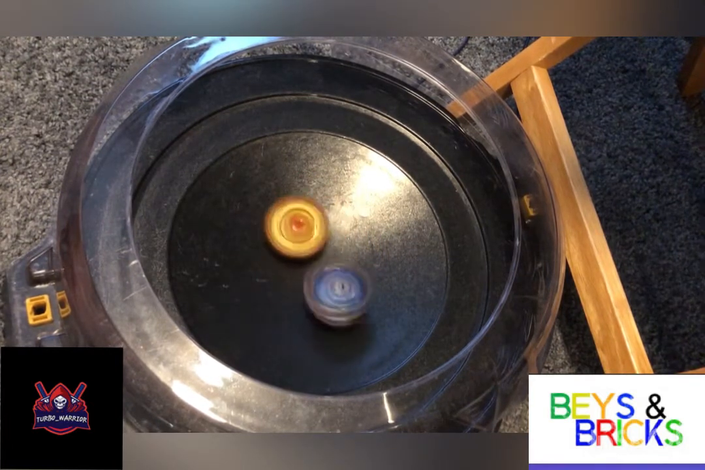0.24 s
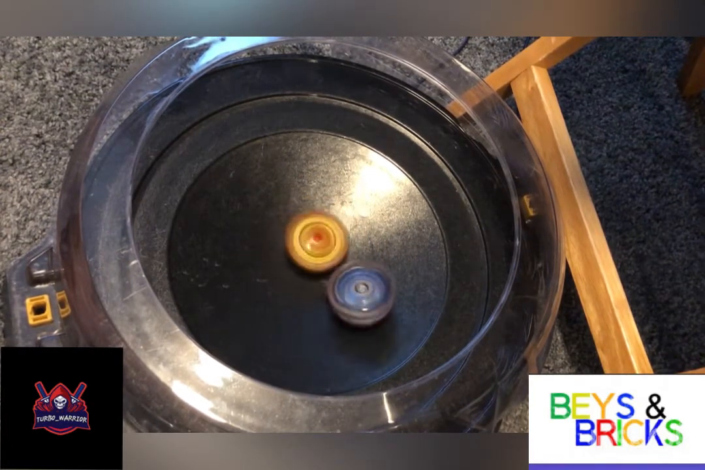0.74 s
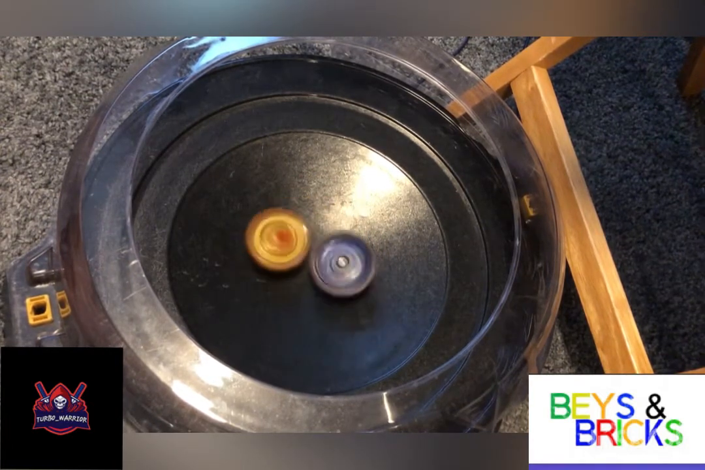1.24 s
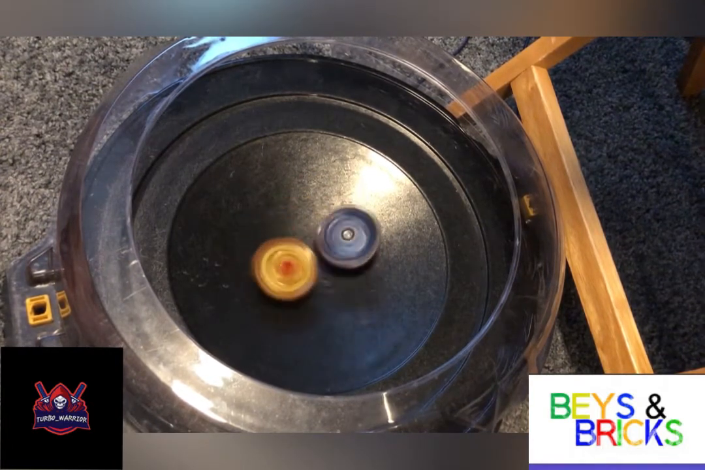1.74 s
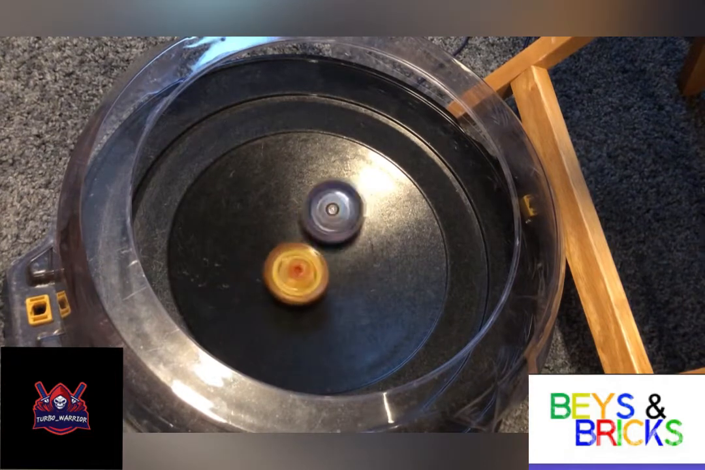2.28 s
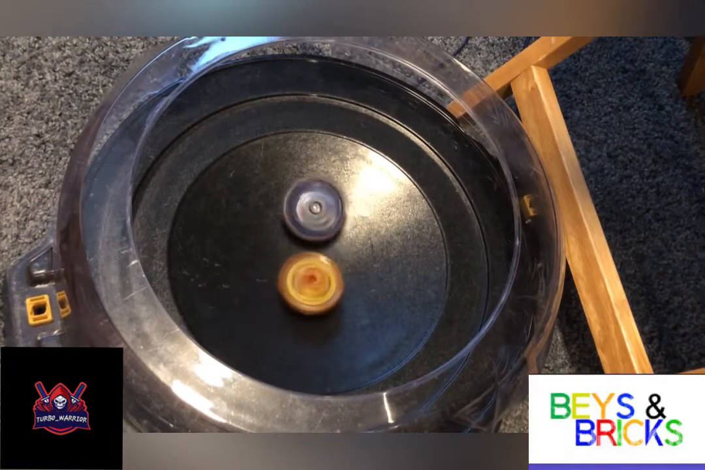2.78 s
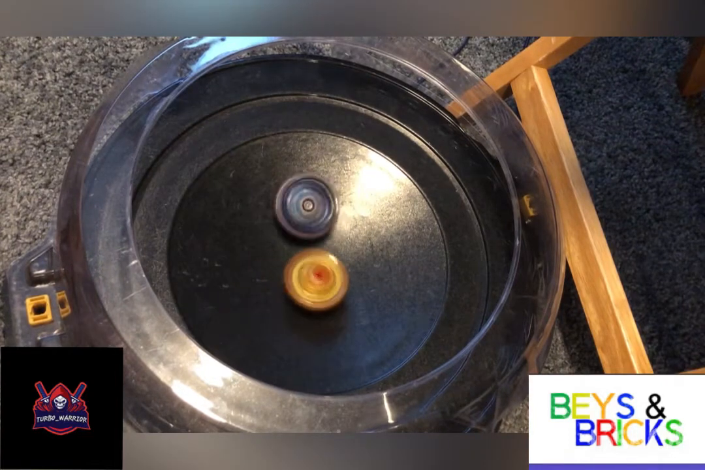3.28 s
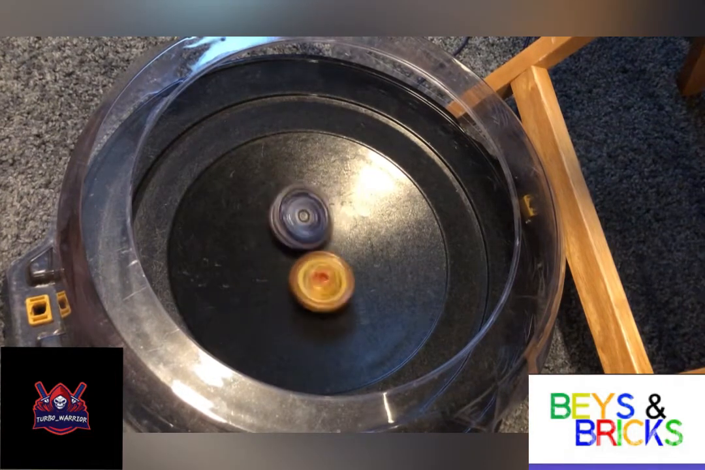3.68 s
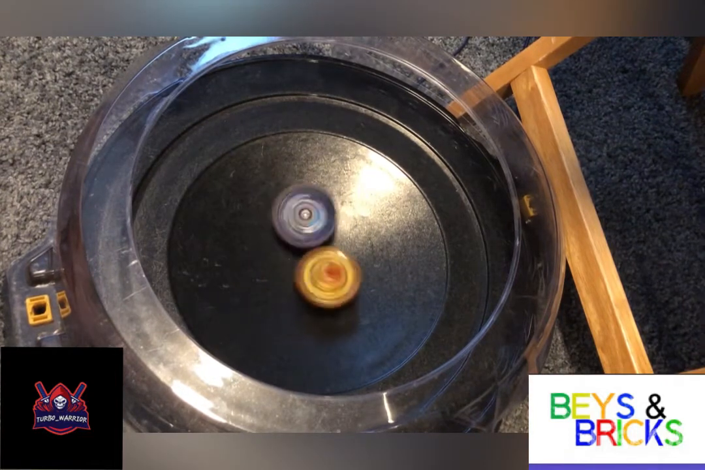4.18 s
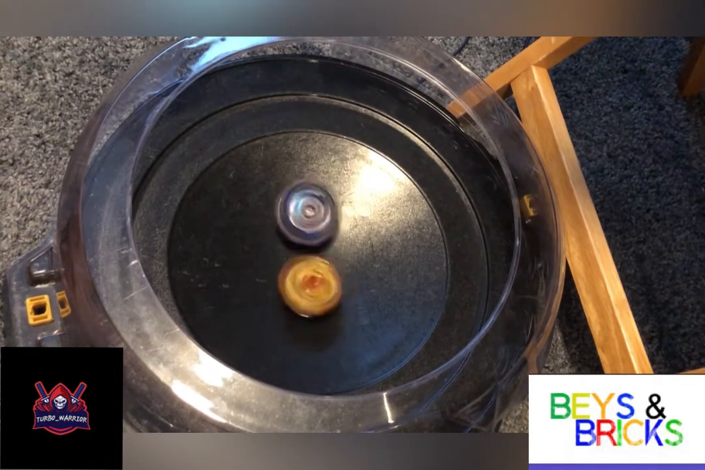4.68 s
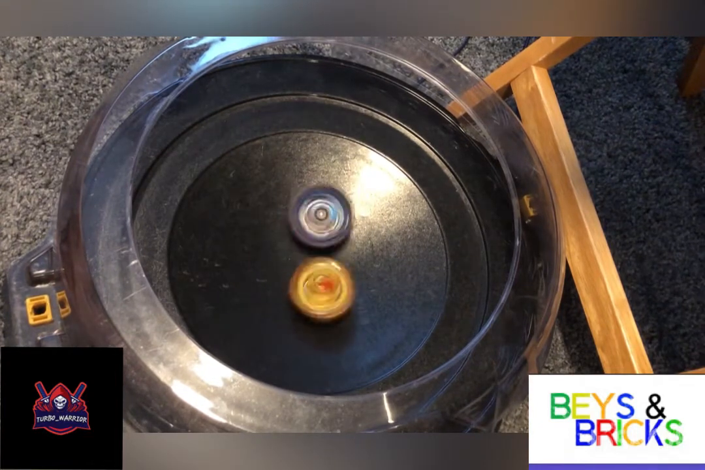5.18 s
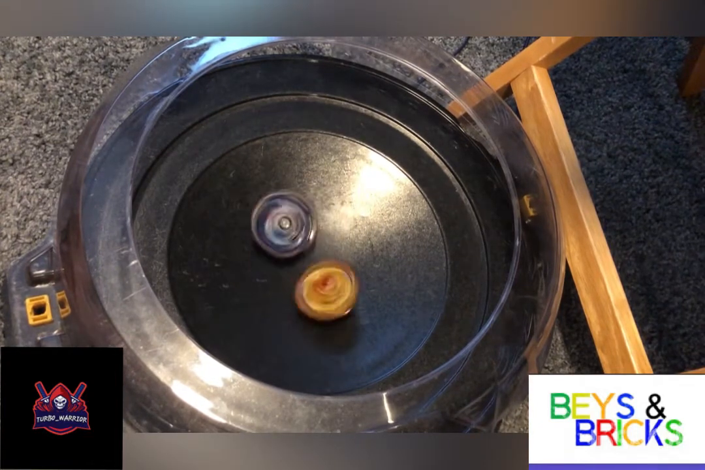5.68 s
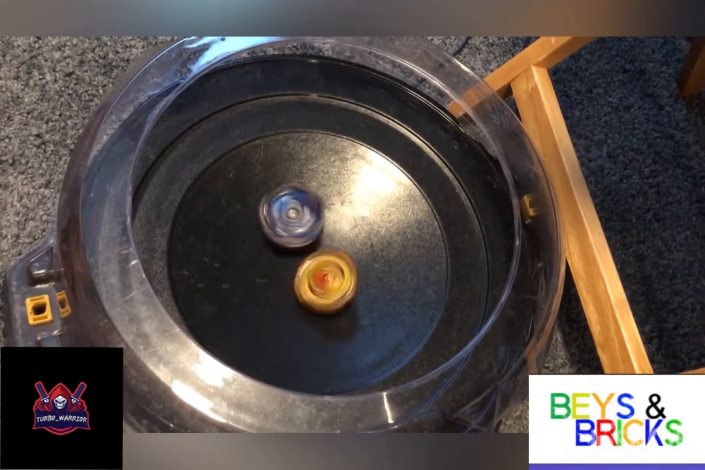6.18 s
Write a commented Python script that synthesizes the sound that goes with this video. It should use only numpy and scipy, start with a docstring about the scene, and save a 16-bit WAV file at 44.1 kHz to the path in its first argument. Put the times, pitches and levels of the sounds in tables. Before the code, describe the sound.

Two toy spinning tops with metal weight rings knock together in a hollow plastic arena. Sharp cracks with a short bowl thump come several times a second, unevenly, some leaving a thin high ring. Quick softer taps of wobbling tops fill the gaps, over a fluctuating scrape of tips and a faint low hum. Close microphone, small indoor space, short reflections from the bowl.

```python
"""Two toy spinning tops clash in a plastic arena: each clash cracks, thumps the bowl and rings the weight rings.
Blows are shaped noise plus one push through the bowl's response; rings are decaying, fluttering sines.
Between clashes a wobbling top taps the floor about once a turn, as softer blows.
The tips grind (filtered noise and skips) and squeak (gliding tones) over a low hum in a soft rumble."""
import sys
import numpy as np
from scipy import signal
from scipy.fft import rfft, irfft, next_fast_len
from scipy.io import wavfile
from scipy.ndimage import uniform_filter1d

SR = 44100
rng = np.random.default_rng(int(sys.argv[2]) if len(sys.argv) > 2 else 0)


def log_audio(samples):
    """Write samples as a 16-bit WAV file to the path given in sys.argv[1]."""
    # one column per channel
    frames = np.atleast_2d(samples).T
    # limit to full scale, then quantise
    limited = np.clip(frames, -1, 1)
    pcm = np.round(limited * 32767).astype(np.int16)
    wavfile.write(sys.argv[1], SR, pcm)


N = 283561
TIME_S = np.arange(N) / SR


def amp(db):
    """Amplitude factor of a level in dB."""
    return 10 ** (np.asarray(db) / 20)


def evened(x):
    """Scale to unit RMS."""
    return x / np.sqrt(np.mean(x ** 2) + 1e-20)


def add(mix, start_s, sound):
    """Mix a sound in at its start time, cut at the end of the scene."""
    part = mix[max(round(start_s * SR), 0):][:len(sound)]
    part += sound[:len(part)]


def drift(corner_hz):
    """Random wandering of unit RMS: noise low-passed at corner_hz."""
    size = next_fast_len(N)
    smooth = 1 / (1 + (np.fft.rfftfreq(size, 1 / SR) / corner_hz) ** 4)
    return evened(irfft(rfft(rng.standard_normal(size)) * smooth, size)[:N])


# resonances of plastic bowl and shells: (f/Hz, width/Hz, height/dB at depth 1)
BOWL_MODES = [(168.5, 52, 10.5), (259.4, 51, 14), (313, 7.3, 12.5), (413, 182, 18), (562, 58, 5.5),
              (725, 110, 6.5), (1020, 63, 7), (1277, 274, 11), (1551, 83, 9.5), (1947, 59, 10),
              (2406, 244, 8.5), (2724, 104, 9.5), (2882, 160, 8.5), (4180, 470, 9), (4720, 370, 6.5),
              (8330, 750, 3)]
FREQS_HZ = np.fft.rfftfreq(8192, 1 / SR)


def body(colour, lo_hz, hi_hz, depth):
    """Minimum-phase response of the bowl in one band: broad colour plus resonances scaled by depth."""
    hz, db = np.transpose(colour)
    peaks_db = sum(height / (1 + (2 * (FREQS_HZ - f) / width) ** 2) for f, width, height in BOWL_MODES)
    colour_db = np.interp(np.log(FREQS_HZ + 1), np.log(hz), db)
    high_pass = 1 + (lo_hz / (FREQS_HZ + 1)) ** 8
    low_pass = 1 + (FREQS_HZ / hi_hz) ** 8
    gain = amp(colour_db + depth * peaks_db) / np.sqrt(high_pass * low_pass)
    log_gain = np.log(np.maximum(gain, gain.max() * 1e-4))
    circle = np.concatenate([log_gain, log_gain[-2:0:-1]])
    spectrum = np.exp(np.conj(signal.hilbert(circle)))  # log gain sets the phase
    return np.fft.ifft(spectrum).real[:len(FREQS_HZ) // 2]


def blow(response, push, rise_s, first_s, tail, t60_s, lumps_db):
    """One push amid ms of uneven chatter, then weakening arena reflections; unit RMS over the first 15 ms."""
    t = np.arange(SR // 5) / SR
    noise, sizes = rng.standard_normal((2, len(t)))
    swell = 1 - np.exp(-(t / rise_s) ** 2)
    contacts = evened(uniform_filter1d(sizes, size=48))  # about 1 ms each
    lumps = amp(lumps_db * np.clip(contacts, -2, 2))
    decay = np.exp(-t / first_s) + tail * amp(-60 * t / t60_s)
    force = noise * swell * evened(lumps) * decay
    force[round(rise_s * SR)] += push
    sound = signal.fftconvolve(force, response)
    return sound / np.sqrt(np.mean(sound[:round(.015 * SR)] ** 2))


# broad colour of the grind: (f/Hz, level/dB)
GRIND_COLOUR = [(20, -28), (40, -18), (70, 7), (130, -11.5), (250, -8.5), (500, -10), (900, -8.5),
                (1400, -20.5), (1900, -23), (3000, -18.5), (4500, -15.5), (6000, -15), (10000, -18.5),
                (16000, -35)]
# grind of the tips before band gains, on the whole more as the spin runs down: (t/s, level/dB)
GRIND_LEVEL = [(0.0, -51.5), (1.16, -54), (1.4, -53.5), (1.74, -48.5), (3.53, -48), (3.94, -57),
               (4.15, -43.5), (4.32, -46.5), (4.73, -50), (5.62, -43.5), (6.07, -49), (6.43, -48)]


def rolling(rumble_db, scrape_db, hiss_db, uneven_db, throb_db, skips_per_s, skip_size):
    """Tips grind over plastic and skip on scratches: noise and impulses, throbbing once a turn as spin slows."""
    grind_db = np.interp(TIME_S, *np.transpose(GRIND_LEVEL))
    mean_db = grind_db.mean()
    spin_hz = np.interp(TIME_S, [0, N / SR], [22, 15]) + drift(9.5)
    turns = np.cumsum(spin_hz) / SR
    throb = amp(throb_db * np.sin(2 * np.pi * turns))
    sizes = skip_size * np.minimum(rng.exponential(1, N), 2.5)
    skips = sizes * (rng.random(N) < skips_per_s / SR)
    out = np.zeros(N)
    # (lower f/Hz, upper f/Hz, gain/dB, share of level changes, share of skips)
    bands = [(94.0, 636, rumble_db, 1.5, 1),
             (740, 1840, scrape_db, 1.05, 0.91),
             (1980, 22000, hiss_db, 0.9, .1)]
    for lo_hz, hi_hz, gain_db, follow, skip_share in bands:
        rubbing = rng.standard_normal(N) * amp(uneven_db * drift(19))
        force = (rubbing + skip_share * skips) * throb
        grind = signal.oaconvolve(force, body(GRIND_COLOUR, lo_hz, hi_hz, depth=0.9))[:N]
        level_db = gain_db + mean_db + follow * (grind_db - mean_db)
        out += amp(level_db) * evened(grind)
    return out


def squeaks(gain_db, hz, glide, width_hz, uneven_db):
    """Each of two tips chirps faintly within the scrape: a gliding sine under random amplitude."""
    level = amp(np.interp(TIME_S, *np.transpose(GRIND_LEVEL)) + gain_db)
    chirps = np.zeros(N)
    for _ in range(2):
        pitch_hz = hz * np.exp(glide * drift(9))
        tone = np.sin(2 * np.pi * np.cumsum(pitch_hz) / SR)
        chirps += tone * drift(width_hz) * amp(uneven_db * drift(10.5))
    return level * evened(chirps)


HUM_FADE_DB_PER_S = 0.15


def hum(hz, tone_db, rumble_db):
    """Low sine of wavering pitch and level in low-passed noise, both fading slowly."""
    pitch_hz = hz + 3 * drift(5.7)
    tone = np.sin(2 * np.pi * np.cumsum(pitch_hz) / SR) * (1 + 0.28 * drift(36))
    # (f/Hz, level/dB)
    colour = [(20, -10), (32, 1), (42, -34), (52, 7.5), (66, -1.5), (95, 7), (125, -10.0), (200, -16.5)]
    rumble = signal.oaconvolve(rng.standard_normal(N), body(colour, 11, 240, depth=0))[:N]
    fade = amp(HUM_FADE_DB_PER_S * (TIME_S.mean() - TIME_S))
    return fade * (amp(tone_db) * evened(tone) + amp(rumble_db) * evened(rumble))


# broad colour of a tap: (f/Hz, level/dB)
TAP_COLOUR = [(60, 4), (300, -1), (700, -3.5), (1300, 0), (2000, -8.5), (2350, -7.5), (2580, -2),
              (2850, -10.5), (3300, -16.5), (4700, -24), (6000, -21), (8500, -24.5), (12000, -33),
              (16000, -28)]
# spells of wobbling, level before band gains: (first tap t/s, taps, sway period/s, level/dB)
WOBBLES = [(.001, 5, .0442, -52), (.359, 2, .044, -51.5), (0.687, 2, .049, -55.5), (.887, 1, .05, -52.5),
           (.935, 3, .051, -47), (1.357, 3, .0515, -57), (1.955, 3, .058, -45), (2.287, 1, .05, -50),
           (2.306, 1, .05, -43.5), (2.554, 2, .066, -44), (2.788, 2, .026, -50.5), (3.149, 2, .077, -46.5),
           (3.526, 3, .043, -50.5), (3.838, 1, .05, -54), (3.962, 1, .05, -56), (4.057, 1, .05, -55),
           (4.234, 5, .053, -53), (4.662, 2, .063, -56), (5.406, 1, .05, -47), (5.704, 2, .018, -55),
           (6.161, 2, 0.037, -55), (6.288, 1, .05, -52.5)]


def taps(thump_db, knock_db, clack_db, fizz_db, dulling_db_per_s):
    """Tilted top touches down each sway: short shell tick, duller as spin slows, with a faint arena trail."""
    out = np.zeros(N)
    # (lower f/Hz, upper f/Hz, push, first decay/s, share of dulling, gain/dB)
    bands = [(80, 650, 8, .005, 1, thump_db),
             (650, 1900, 4, .007, .2, knock_db),
             (1900, 3200, 9, .004, -.6, clack_db),
             (3200, 17000, 2, .006, -.2, fizz_db)]
    for lo_hz, hi_hz, push, first_s, dulling, gain_db in bands:
        response = body(TAP_COLOUR, lo_hz, hi_hz, depth=1.0)
        for start_s, count, period_s, level_db in WOBBLES:
            tap_db = level_db + gain_db + dulling * dulling_db_per_s * start_s
            for k in range(round(count)):
                tick = blow(response, push, rise_s=.0028, first_s=first_s, tail=.18, t60_s=.22, lumps_db=2.5)
                add(out, start_s + k * period_s, amp(tap_db) * tick)
    return out


# broad colour of a clash: (f/Hz, level/dB)
CLASH_COLOUR = [(30, -16.5), (60, -3), (110, 3.5), (190, -5.5), (350, -9.5), (520, -7.5), (750, -12),
                (1300, -11.5), (1850, -18), (3300, -14), (5500, -20), (7800, -16.5), (11000, -23.5),
                (16000, -16)]
# boom, thump, knock, clack, crack: (lower f/Hz, upper f/Hz, push, first decay/s, tail share, tail t60/s)
CLASH_BANDS = [(33.5, 337, 7.9, 0.0035, 0.4, 0.17), (360, 646, 11, 0.0024, 0.5, 0.11),
               (664, 1740, 5.8, 0.011, 0.43, 0.24), (2090, 6000, 2.27, 0.0044, 0.18, 0.23),
               (6300, 11000, 5, 0.0047, 0.61, .17)]
# answer of each band; slower tops boom less:
# (level/dB, dB per dB strength, dB per dB hardness, spin-down slope/(dB/s))
BAND_ANSWER = [(-28.5, 1.0, -0.06, -0.5751), (-34.5, 1.58, -0.06, .5), (-36.5, 0.67, 0.02, 0),
               (-37, 1.05, 0.99, 0.14), (-40, 1.31, 1.08, 0)]
# clashes and knocks; harder is brighter, the spot struck favours one pitch:
# (t/s, strength/dB, hardness/dB, ring/dB, favoured f/Hz)
CLASHES = [(0.2015, 3.5, 6, -7, 10540), (0.4422, 4, 0, 0, 2900), (0.4514, -7.5, 14.5, -7, 2800),
           (0.5417, -2.5, 0.5, 3.5, 2820), (.5711, 3, 4, 2.5, 2780), (0.7739, 4, 4, 11, 4140),
           (1.092, -9.5, -8.5, 14, 2800), (1.128, 7, -0.5, 5, 4470), (1.2044, -7.5, 2, -2, 2800),
           (1.236, 2, 3.5, 5.5, 8470), (1.491, -14, 6, -3, 8470), (1.501, -1, 2.5, -19, 8470),
           (1.524, -6.5, 5.5, 6.5, 8470), (1.656, 3.5, 1, -5, 4470), (1.775, 4, 0, -13, 8470),
           (1.896, -12.5, -29, -7, 4470), (2.135, -1.5, 8, -1, 2870), (2.168, -17, 12, 11, 10540),
           (2.18, 1, 0, -11, 8470), (2.361, -2, 0, 8, 10540), (2.418, 4, 1.5, 6, 8470),
           (2.66, -9.5, 4.5, 4, 10540), (2.668, 3, 1.5, -8, 8470), (2.863, 3, 2, 5, 4470),
           (2.944, -0.5, 1.5, 9, 4470), (3.005, -3.5, 5, -5, 4470), (3.016, -5, 6.5, 6, 4470),
           (3.305, -1, -1, 3.5, 2910), (3.332, -14, 10.5, -8, 8470), (3.375, -4, 6.5, -7, 6620),
           (3.445, -3, -5.5, -7, 8470), (3.452, -13, 15, -7, 6620), (3.668, -2, 2, -15, 8470),
           (3.714, -2.5, 1.5, -2, 8470), (3.904, -.5, 7, -2, 6620), (4.088, -1.5, 3.5, -12, 4470),
           (4.156, -11, -1, 14, 4470), (4.172, 0.5, 1.5, -4, 10540), (4.448, -11, -8, 0, 4570),
           (4.504, -5, -7.5, 26.5, 4470), (4.516, 3, 3.5, 8, 10540), (4.739, -.5, 0, 4, 8470),
           (4.848, -5.5, -1.5, -3, 4470), (4.862, -2, 0.5, -4, 8470), (4.973, 0, 2.5, 8, 10540),
           (5.105, -1.5, 3.5, -1, 5400), (5.274, 3, 1, 2, 4470), (5.442, -6.5, -0.5, -3, 5400),
           (5.449, 0.5, -2, -15, 8470), (5.513, -5, -5, -2, 8470), (5.567, -4.5, 2.5, 0, 8470),
           (5.787, -9.5, -46, 7, 4470), (5.81, -10.5, 0, -6, 4470), (5.869, -7.5, -3, -11, 8470),
           (5.972, -6, -8, 1, 8470), (6.094, -5.5, -0.5, -18, 8470), (6.324, -2, -3.5, -14, 10540),
           (6.38, -8, -4, -7, 4470), (6.406, -7, -10, 2, 4470)]


def clashes():
    """Rim meets rim: shells crack and tips kick the bowl; hardness goes into the treble."""
    out = np.zeros(N)
    for band, answer in zip(CLASH_BANDS, BAND_ANSWER):
        lo_hz, hi_hz, push, first_s, tail, t60_s = band
        gain_db, by_strength, by_hardness, by_time = answer
        response = body(CLASH_COLOUR, lo_hz, hi_hz, depth=0.99)
        for start_s, strength_db, hardness_db, _, _ in CLASHES:
            level_db = gain_db + by_strength * strength_db + by_hardness * hardness_db + by_time * start_s
            hit = blow(response, push, rise_s=.003, first_s=first_s, tail=tail, t60_s=t60_s, lumps_db=0.5)
            add(out, start_s, amp(level_db) * hit)
    return out


# modes, short in the shells and long in the metal weight rings: (f/Hz, level/dB, t60/s)
RING_MODES = [(2705, 0, .1), (2751, -6, .15), (2920, -2, .08), (4466, -3, 1.7), (4484, -8, .9),
              (5400, -17, .4), (5930, -12, .35), (6621, -7, .2), (8242, -11, .13), (8446, -2, .15),
              (8500, -6, .17), (9755, -16, .25), (10520, -1, .38), (10570, -6, .27), (10990, -9, .22),
              (12030, -8, .2), (14490, -11, .15)]
# how strongly a clash reaches the modes: (f/Hz, level/dB)
RING_COLOUR = [(2750, -50), (4470, -81), (6600, -50), (8470, -58), (10540, -80.5), (12000, -53)]
FAVOUR_DB, FAVOUR_WIDTH_HZ = 17.5, 540


def rings(min_spin_hz, swing, scatter_db):
    """Strong, hard clashes ring the metal, most near the favoured pitch; spin flutters level and phase."""
    out, t = np.zeros(N), np.arange(SR) / SR
    onset = (1 - np.exp(-t / 0.0025)) * (1 - t ** 4)
    for start_s, strength_db, hardness_db, ring_db, favoured_hz in CLASHES:
        clash_db = strength_db + hardness_db + ring_db
        draws = rng.random((len(RING_MODES), 4))
        for (hz, db, t60_s), (phase, turn, speed, luck) in zip(RING_MODES, draws):
            u = t[:int(min(.6 * t60_s, 1) * SR)]
            favour_db = FAVOUR_DB * np.exp(-((hz - favoured_hz) / FAVOUR_WIDTH_HZ) ** 2)
            mode_db = db + np.interp(hz, *np.transpose(RING_COLOUR)) + favour_db
            spin = 2 * np.pi * (min_spin_hz * (1 + speed / 2) * u + turn)
            carrier = np.sin(2 * np.pi * (hz * u + phase) + swing * np.cos(spin / 2))
            tone = (1 + swing * np.sin(spin)) * carrier
            level_db = clash_db + mode_db + scatter_db * (2 * luck - 1) - 60 * u / t60_s
            add(out, start_s, amp(level_db) * onset[:len(u)] * tone)
    return out


def overtones(gain_db, scatter_db, mid_t60_s, count):
    """Many weak upper modes of both tops as decaying sines; their mix varies at random from clash to clash."""
    t = np.arange(SR // 3) / SR
    place, phase, damping = rng.random((3, count, 1))
    hz = 3000 + 12500 * (np.arange(count)[:, None] + place) / count
    decay = amp(-60 * t / (mid_t60_s * (.5 + damping)))
    modes = np.sin(2 * np.pi * (hz * t + phase)) * decay * (1 - np.exp(-t / .002))
    slope_db = np.interp(hz[:, 0], [3000, 9000, 15500], [2, -1, -7])
    out = np.zeros(N)
    for start_s, strength_db, hardness_db, _, _ in CLASHES:
        luck = np.clip(rng.standard_normal(count), -2, 1.8)
        level_db = strength_db + hardness_db + gain_db + slope_db + scatter_db * luck
        add(out, start_s, amp(level_db) @ modes)
    return out


def scene():
    """Sum of grind, hum, taps, clashes and ringing metal."""
    grind = rolling(rumble_db=-2.5, scrape_db=-5.5, hiss_db=-16.0, uneven_db=5.5, throb_db=2.0,
                    skips_per_s=33, skip_size=42.0)
    grind = grind + squeaks(gain_db=-15.5, hz=1179, glide=0.15, width_hz=41, uneven_db=-1)
    low_hum = hum(hz=65.9, tone_db=-49.5, rumble_db=-48.5)
    floor_taps = taps(thump_db=-4.5, knock_db=-0.2, clack_db=1.7, fizz_db=-1.5, dulling_db_per_s=1.85)
    hits = clashes() + floor_taps
    metal = rings(min_spin_hz=31.64, swing=0.49, scatter_db=9.5)
    shimmer = overtones(gain_db=-66.5, scatter_db=6, mid_t60_s=.15, count=80)
    return (hits + metal + shimmer + grind + low_hum)[None]


EDGE_HZ = 16100


def record(dry):
    """Band limit: linear-phase low-pass at EDGE_HZ."""
    low_pass = signal.firwin(301, EDGE_HZ, window=("kaiser", 8), fs=SR)
    return signal.oaconvolve(dry, low_pass[None], "same")


dry = scene()
out = record(dry)
log_audio(out)
```